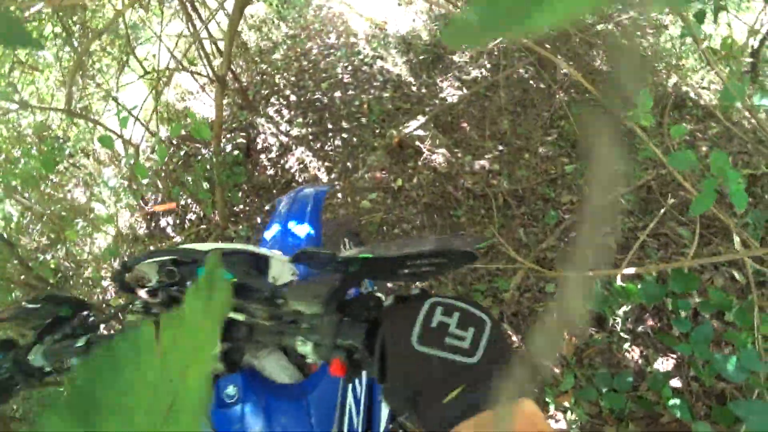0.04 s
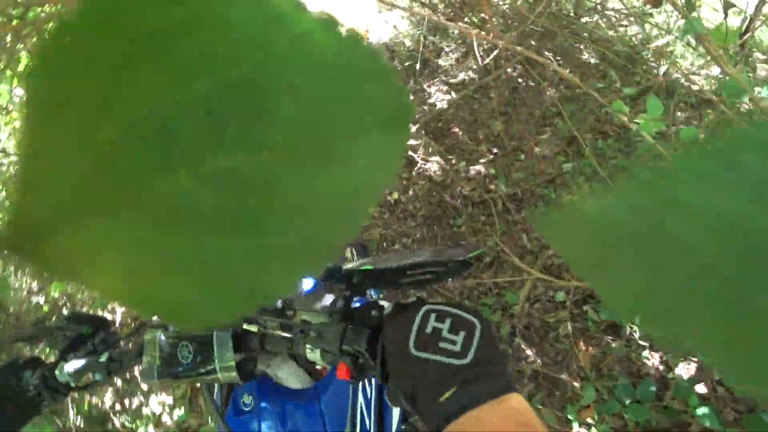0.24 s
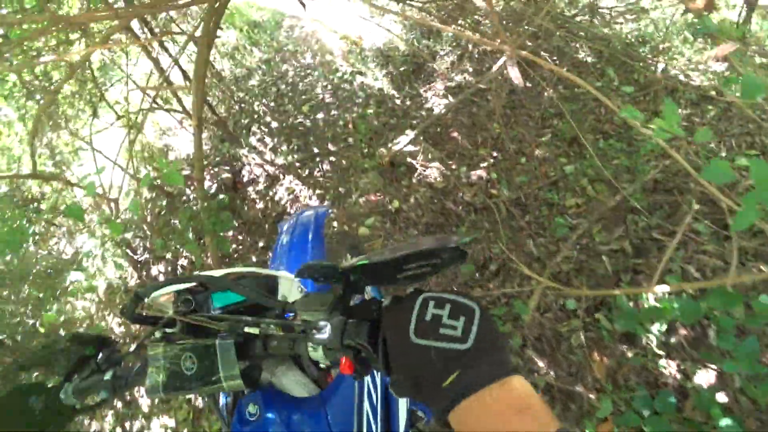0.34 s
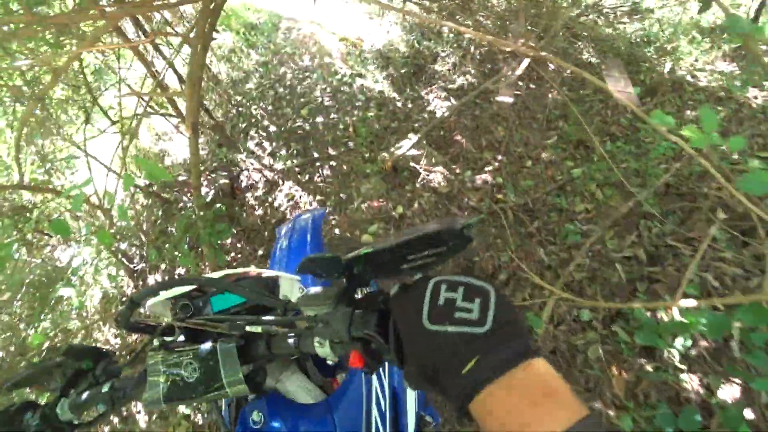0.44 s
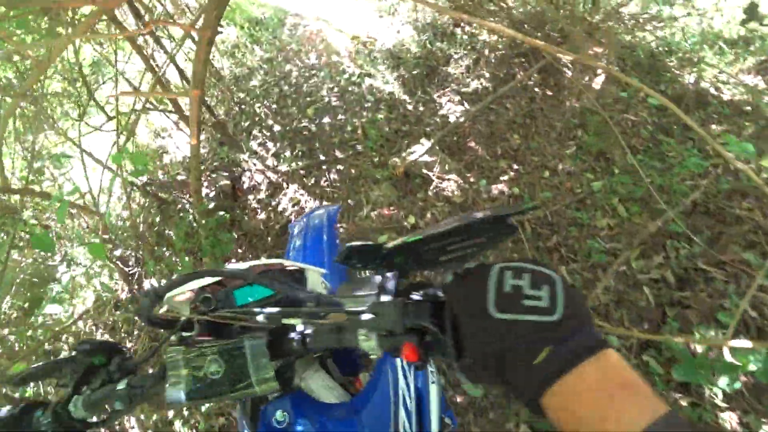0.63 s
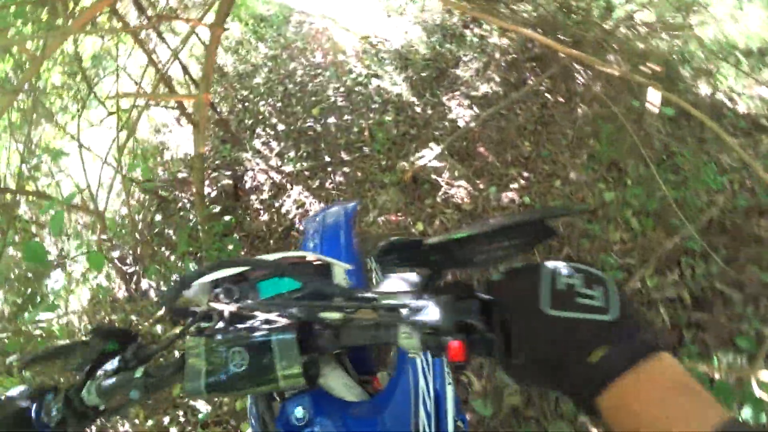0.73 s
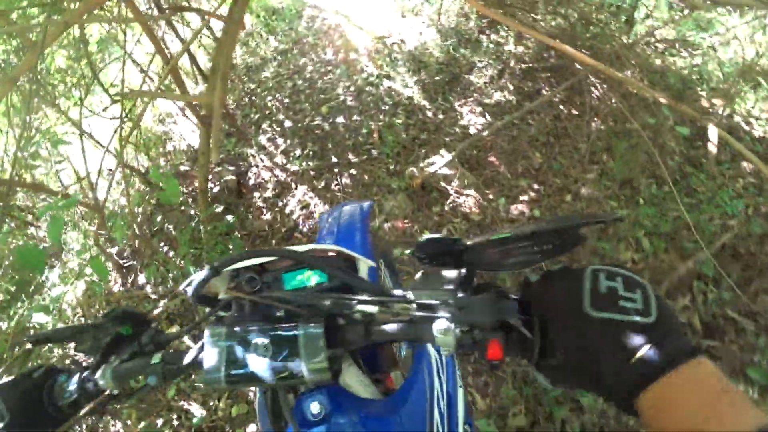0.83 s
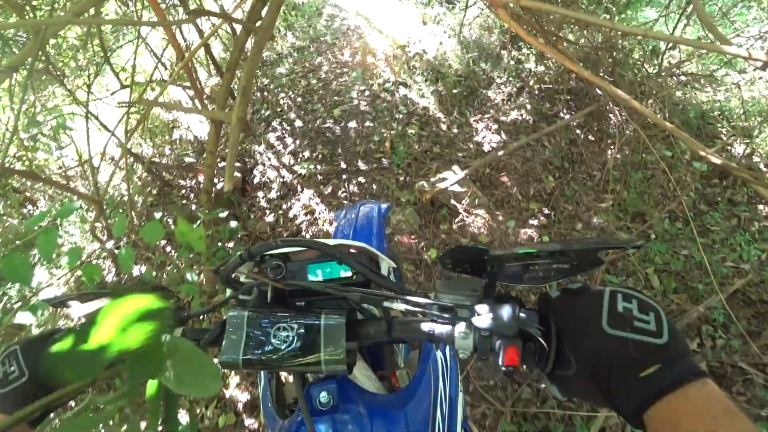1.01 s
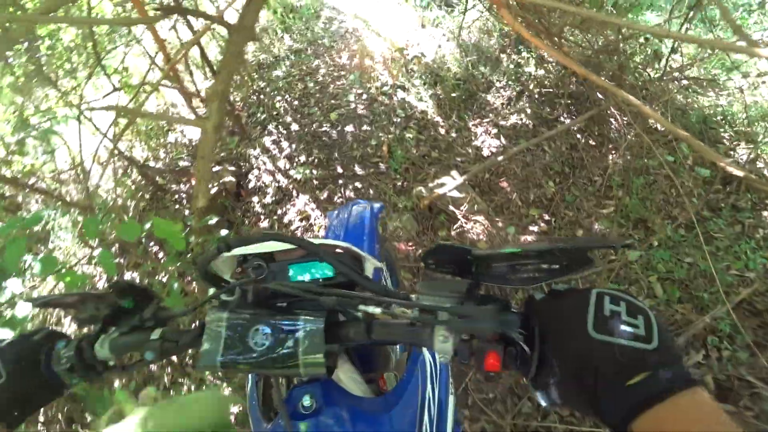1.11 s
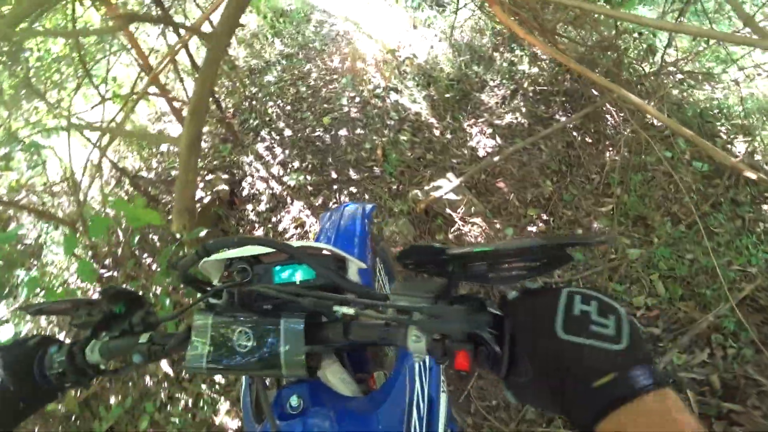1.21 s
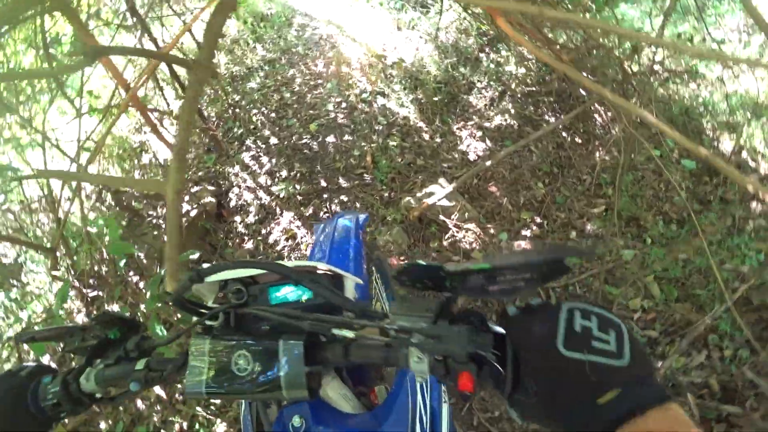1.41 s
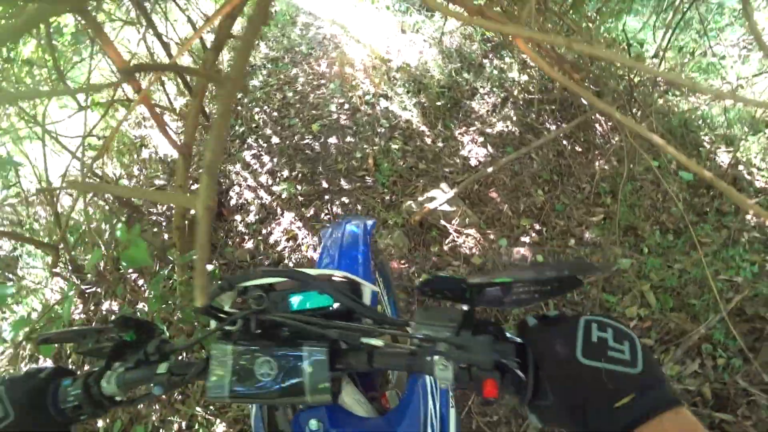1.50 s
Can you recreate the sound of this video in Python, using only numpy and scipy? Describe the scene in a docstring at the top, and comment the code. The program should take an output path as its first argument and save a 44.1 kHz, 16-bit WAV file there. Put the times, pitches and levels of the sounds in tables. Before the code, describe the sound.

Harsh rustling knocks of foliage against a helmet camera, with a single-cylinder engine puttering low underneath

```python
"""A single-cylinder motorbike idles in a thicket, heard through a helmet camera with two microphone ports.
Pipe resonances fed by the firings and coloured noise sound throughout, while twigs add snaps of noise.
Leaves and twigs drag over the camera: stick-slip clicks and knocks ring the modes of its housing, densest
from 0.24 to 0.42 s; after a quieter stretch a twiggier bout follows near 1 s and dies away after 1.2 s.
The housing is loud, and its main modes arrive almost opposite in the two ports."""
import sys
import numpy as np
from scipy import signal
from scipy.fft import rfft, irfft
from scipy.io import wavfile
from scipy.ndimage import uniform_filter1d

SR = 44100
rng = np.random.default_rng(int(sys.argv[2]) if len(sys.argv) > 2 else 0)


def put_to_file(sound):
    """Save the sound as 16-bit audio at rate SR, in the file named by the first command-line argument."""
    columns = np.atleast_2d(sound).T  # one column per channel
    safe = np.clip(columns, -1, 1)
    whole_steps = np.round(safe * 32767)
    wavfile.write(sys.argv[1], SR, whole_steps.astype(np.int16))


def voltage_ratio(decibels):
    """Convert decibels (scalar or array-like) to amplitude ratios, 20 dB per decade."""
    exponent = np.asarray(decibels, float) / 20
    return 10 ** exponent


N = 68355  # length in samples


def evened(x):
    """Normalisation: divides a signal by its root mean square."""
    return x / np.sqrt(np.mean(abs(x) ** 2) + 1e-20)


def mode(x, hz, width):
    """Damped resonance: a click of size 1 rings with height 1, as a complex wave; width in Hz sets the decay."""
    pole = np.exp((2j * np.pi * hz - np.pi * width) / SR)
    return -1j * signal.lfilter([1], [1, -pole], x)


def turn_at(hz):
    """Interaural-like phase: the angle between the ports varies with frequency."""
    # Each row: frequency in Hz, phase by which the left port leads in radians.
    port_turn = [(30, 0.24), (300, 1.6), (690, 2.72), (2300, 2.64), (4600, 2.61), (8100, .6), (16000, 0.1)]
    f, turn = np.transpose(port_turn)
    return np.interp(np.log(hz + 1), np.log(f), turn)


def ports(left, right, turn, pan_db):
    """Phase and level difference: the left port leads by turn (radians) and exceeds the right by pan_db."""
    left_port = left * np.exp(.5j * turn) * voltage_ratio(pan_db / 2)
    right_port = right * np.exp(-.5j * turn) * voltage_ratio(-pan_db / 2)
    return np.array([left_port, right_port])


def firings():
    """Cycle phase: the running count of firings, one per engine cycle, whole at each firing."""
    # Each row: time in seconds, firings so far.
    fired = [(-.030, -1), (.079, 1), (.722, 13), (.927, 17), (1.576, 30)]
    s, count = np.transpose(fired)
    return np.interp(np.arange(N) / SR, s, count)


def effort_db():
    """Engine load: a slow contour of effort in dB that raises and lowers the engine's sounds."""
    # Each row: time in seconds, engine effort in dB.
    load = [(0, -2), (.3, 0.1), (.55, -4.5), (.75, -4), (.95, 1.4), (1.2, 2.5), (1.3, 4.5), (1.419, -1.5),
            (1.55, -4.5)]
    return np.interp(np.arange(N) / SR, *np.transpose(load))


def rattle():
    """Amplitude-modulated noise: engine clatter and air, partly coherent between ports, breathe with the cycle."""
    # Each row: frequency in Hz, relative spectral level in dB.
    rattle_spectrum = [(30, -9), (120, -32), (180, -11), (270, -10), (380, -9.5), (700, -16.5), (1100, -10),
                       (1700, -18), (2800, -22), (3700, -30), (4800, -21.5), (6500, -32.5), (8500, -45.5),
                       (12000, -41), (16000, -53)]
    likeness = 0.58  # share of the left port's noise amplitude found in the right
    level_db, effort_share = -45, 0.44
    gate_db, gate_lag = 1.5, 0.29  # swing each way in dB, loudest point as a fraction of the cycle
    hz = np.fft.rfftfreq(N, 1 / SR)
    a, b = rfft(rng.standard_normal((2, N)))
    right = likeness * a + np.sqrt(1 - likeness ** 2) * b
    f, db = np.transpose(rattle_spectrum)
    colour = voltage_ratio(np.interp(np.log(hz + 1), np.log(f), db))
    noise = irfft(ports(a, right, turn_at(hz), -2.4) * colour, N)
    breath_db = gate_db * np.cos(2 * np.pi * (firings() - gate_lag))
    return voltage_ratio(level_db + effort_share * effort_db() + breath_db) * evened(noise)


def exhaust():
    """Pulse-excited pipe resonance: each firing sends a soft blow down the pipe."""
    # Each row: frequency in Hz, width of each of two cascaded resonators in Hz, relative level in dB.
    pipe_modes = [(139, 160, -33.5), (286.2, 67.6, -2.5), (476, 50, -11.5)]
    thump_db, spread_db, blow_s = -44.5, 3.5, 0.002
    blows = np.zeros(N)
    # A weaker blow follows half a cycle later, on the idle turn of the crank.
    between_db = -11.5 + 0.83 * effort_db()
    for lag, db in [(0, np.zeros(N)), (.5, between_db)]:
        at = np.flatnonzero(np.diff(np.floor(firings() - lag)) > 0)
        blows[at] = voltage_ratio(db[at] + spread_db * rng.standard_normal(len(at)))
    blows = np.convolve(blows, np.hanning(round(blow_s * SR) + 3))[:N]
    pipe = np.zeros(N, complex)
    for hz, width, db in pipe_modes:
        pipe += voltage_ratio(db) * mode(mode(blows, hz, width).real, hz, width) * width ** 2
    thumps = ports(pipe, pipe, 0.98, -1.5).real
    return voltage_ratio(thump_db + effort_db()) * evened(thumps)


def ticks():
    """Band-limited noise bursts: small bright snaps of dry twigs, alike in both ports."""
    # Each row: start in seconds, relative level in dB, centre frequency in Hz.
    snaps = [(.591, -35, 11100), (.961, -31.5, 9000), (1.035, -39, 12000), (1.115, -40, 10000),
             (1.527, -43, 6500)]
    decay_s, relative_width = 0.0042, 0.87  # resonator width as a fraction of its frequency
    out, t = np.zeros(N), np.arange(1000) / SR
    for s, db, hz in snaps:
        width = hz * relative_width
        burst = rng.standard_normal(1000) * np.exp(-t / decay_s)
        snap = mode(mode(burst, hz, width).real, hz, width).real
        out[round(s * SR):][:1000] += voltage_ratio(db) * snap
    return out


def housing():
    """Stick-slip and impact excitation: random slips, and knocks of a blow and a short skid, ring the modes."""
    # Each row: frequency in Hz, nominal width in Hz (doubled in each of two cascaded resonators),
    # relative level under leaves in dB, the same under a twig in dB, left over right in dB,
    # phase by which the left port leads in radians.
    housing_modes = [(97, 13.3, -22, -27, -8, 0.85), (180, 23.3, -11.5, -25, -8.5, 1.68),
                     (249.5, 4.87, -11.5, -29, -8, 1.58), (312, 46, -1.5, -15, -6, 1.39),
                     (457, 94, -3.5, -43, -8, 1.89), (669, 65, -3, 2, -5.5, 2.46),
                     (732.4, 37.6, -8.5, 4, -2.5, 2.02), (856, 82, -1.5, 3, -4.5, 2.03),
                     (1118, 95, -4, 1, -2.4, 2.33), (1555, 252, -2.5, -4.5, -1.26, 2.47),
                     (2187, 145, -8, -15.5, 0.5, 2.44), (2638, 386, -8, -22.5, -1, 2.48),
                     (3610, 780, -19, -28, -3, 2.7), (5010, 570, -16.5, -26.5, -5, 1.92),
                     (6173, 203, -26.5, -23, 0, 0.93), (7150, 750, -33.5, -51.5, -0.5, 0.31),
                     (10000, 2700, -43.5, -56, -1, 0.44), (11600, 1400, -53.5, -67, -2, 0.61)]
    # Each row: time in seconds, relative drag pressure in dB, sharpness in dB per octave,
    # what drags from 0 for leaves to 1 for a twig.
    drag = [(0, -63, -10.5, 0.01), (.11, -69, -1, 0.01), (0.123, -34.5, -2.5, 0.016),
            (.155, -46, -9.5, 0.0051), (.19, -47, 0.5, 0.01), (.205, -38, -5, 0.021),
            (.241, -38.5, -2.5, 0.01), (0.244, -14, 0, 0.0062), (0.271, -13, -3.5, 0.0078),
            (.288, -17, -2, 0.0079), (0.313, -22.5, 6, 0.01), (0.326, -23, -3, 0.0092),
            (0.352, -35.5, 1, 0.01), (0.374, -31.5, 7, 0.49), (.397, -32, 8, 0.5), (0.404, -35.5, -4, 0.24),
            (0.42, -27.5, 4, 0.092), (.435, -55, 8, 0.3), (.47, -51, 3, 0.078), (.52, -64, 5, 0.088),
            (0.596, -44.5, -8.5, 0.17), (.62, -37, -3.5, 0.11), (.68, -36, -2.5, 0.076),
            (.74, -40.5, -1, 0.44), (.8, -45.5, 0.5, 0.57), (.89, -43.5, -1, 0.62), (0.949, -44, -8, 0.44),
            (0.963, -22.5, -1, 0.21), (1.0, -42, 5.5, 0.68), (1.012, -23.5, -1.5, 1), (1.045, -23, 4, 0.93),
            (1.071, -36.5, 3.5, 0.55), (1.077, -28, 4, 0.58), (1.1, -21, -0.5, 0.52),
            (1.108, -39.5, 6.5, 0.53), (1.132, -22.5, -1.5, .9), (1.148, -20.5, 4, 0.92),
            (1.17, -28.5, 2, 1), (1.195, -31, 2, 0.45), (1.21, -37, 4, 0.83), (1.26, -41.5, 3, .2),
            (1.3, -45, -6.5, 0.065), (1.36, -37.5, -6, 0.074), (1.42, -44, -1, 0.13), (1.46, -51, 4, 0.26),
            (1.55, -62, 7.5, 0.09)]
    # Each row: start in seconds, blow level in dB before the mode weights, sharpness in dB per octave,
    # skid decay time in seconds, favoured frequency in Hz.
    knocks = [(0.117, -18.5, -2.5, 0.011, 910), (0.199, -21.5, 2, 0.0076, 1370),
              (0.202, -25.5, 4.5, 0.012, 1110), (0.244, -18, 4, 0.0071, 794), (0.26, -14, 4, 0.005, 850),
              (0.279, -11, 1, 0.012, 1480), (0.287, -16, -6, 0.0028, 1470), (0.292, -9.5, -2, 0.0044, 675),
              (0.297, -16, 6, 0.0055, 837), (0.305, -13.5, 7, 0.0068, 820), (0.308, -9.5, -5.5, 0.012, 626),
              (0.331, -5.5, 3, 0.012, 640), (0.341, -8, 3.5, 0.0053, 664), (0.353, -6, 1, 0.0014, 736),
              (0.356, -14, 0, 0.004, 767), (0.363, -6, -5, 0.0056, 685), (0.374, -7, -11, 0.0035, 830),
              (0.38, -8, -7, 0.012, 824), (0.386, -9, 1, 0.012, 840), (0.403, -6.5, 0.5, 0.0078, 840),
              (0.415, -4, -4, 0.0022, 635), (0.462, -35, -11.5, 0.0032, 840),
              (0.715, -30.5, 4, 0.0076, 657), (0.748, -34, 0, 0.008, 853), (0.809, -35.5, 4, 0.0051, 767),
              (0.842, -30.5, -2, 0.0021, 872), (0.866, -38.5, -13, 0.004, 716),
              (0.909, -25, 2, 0.0068, 711), (0.963, -17, 3, 0.0022, 666), (0.966, -17, -5, 0.0017, 716),
              (0.979, -25.5, 4, 0.012, 890), (1, -29, 4, 0.0026, 886), (1.012, -7.5, -7.5, 0.012, 704),
              (1.023, -13.5, 1, 0.004, 751), (1.035, -15.5, 7.5, 0.0058, 804),
              (1.04, -19.5, -13, 0.0061, 720), (1.058, -9, -0.5, 0.0027, 684),
              (1.081, -15, 3.5, 0.0045, 740), (1.09, -17.5, 6, 0.0034, 740), (1.12, -15, 3.5, 0.0032, 735),
              (1.138, -11.5, 3, 0.0056, 800), (1.15, -9.5, 3.5, 0.0027, 780),
              (1.171, -20.5, 6, 0.0076, 686), (1.182, -18, -6, 0.0075, 796), (1.279, -38, -7, 0.004, 567),
              (1.308, -28, 0.5, 0.0077, 1550), (1.348, -32, -0.5, 0.004, 1160),
              (1.392, -32.5, -6, 0.004, 920)]
    slips_per_s, slip_spread_db, rub_db = 700, 5.5, -10
    drag_db, apart = -0.5, 0.41  # pressure offset in dB, amplitude of the noise proper to each port
    skid_db, skid_rise_s = -11, 0.0002
    spot_db, spot_octaves = 8.5, 0.48  # a knock favours the modes near the spot it strikes
    deep_hz, treble_hz = 200, 3000
    hard_db, softness = -12, 0.85  # lighter knocks hardly reach the highest and lowest modes
    treble_blow_db, treble_rub_db = -2, -4

    t = np.arange(N) / SR
    s, *controls = np.transpose(drag)
    press_db, sharp, twig = (np.interp(t, s, c) for c in controls)
    slip_db = slip_spread_db * np.minimum(rng.exponential(1, N), 3)
    slips = (rng.random(N) < slips_per_s / SR) * voltage_ratio(slip_db) * rng.choice([-1, 1], N)
    drive = evened(slips) + voltage_ratio(rub_db) * rng.standard_normal(N)

    s, knock_db, knock_sharp, skid_s, spot_hz = np.transpose(knocks)
    at, u = np.round(s * SR).astype(int), np.arange(1500)
    rise = 1 - np.exp(-u / SR / skid_rise_s)
    skids = voltage_ratio(skid_db) * rise * np.exp(-u / SR / skid_s[:, None])

    out = np.zeros((2, N))
    for hz, width, leaf_db, twig_db, pan_db, turn in housing_modes:
        # Sharpness tilts the drive about 800 Hz, within limits, and spares the lowest mode.
        octaves = np.clip(np.log2(hz / 800), -1.5, 3) * (hz > 130)
        reach_db = spot_db * (np.exp(-(np.log2(hz / spot_hz) / spot_octaves) ** 2) - 1)
        if not deep_hz < hz < treble_hz:
            reach_db = reach_db + softness * np.minimum(knock_db - hard_db, 0)
        blow = voltage_ratio(knock_db + knock_sharp * octaves + reach_db)
        force = voltage_ratio(drag_db + press_db + sharp * octaves)
        np.add.at(force, at[:, None] + u, blow[:, None] * skids)
        high = hz > treble_hz
        treble_rub = high * voltage_ratio(treble_rub_db) * rng.standard_normal(N)
        friction = drive + treble_rub + apart * rng.standard_normal((2, N))
        x = friction * force * np.sqrt(width / SR)
        x[:, at] += voltage_ratio(high * treble_blow_db) * blow * rng.choice([-1, 1], len(at))
        x *= voltage_ratio(leaf_db + twig * (twig_db - leaf_db))
        x *= np.sqrt(width / 100) * 2 * np.pi * width / SR
        ring = mode(mode(x, hz, 2 * width).real, hz, 2 * width)
        out += ports(*ring, turn, pan_db).real * 6
    return out


def scene():
    """Superposition: the pressures of all sources add."""
    return rattle() + exhaust() + ticks() + housing()


def top_cut(x):
    """Nothing passes above the cut-off."""
    return signal.sosfilt(signal.butter(12, 16330, fs=SR, output="sos"), x)


def record(dry):
    """Dynamic compression: gain ducks at loud scrapes and recovers slowly; bass cut and hard ceiling follow."""
    knee_db, squeeze = -21.5, 0.18  # squeeze: dB of gain cut per dB over the knee
    recover_db_per_s = 48  # fall of the held level
    power_db = 10 * np.log10(abs(uniform_filter1d((dry ** 2).mean(0), 400)) + 1e-12)
    fall = np.arange(N) * recover_db_per_s / SR
    held_db = np.maximum.accumulate(power_db + fall) - fall
    over_db = np.maximum(held_db - knee_db, 0)
    x = dry * voltage_ratio(-squeeze * uniform_filter1d(over_db, 200))
    x = signal.sosfilt(signal.butter(2, 120, "high", fs=SR, output="sos"), x)
    return top_cut(np.clip(x, -1, 1))


dry = scene()
out = record(dry)
put_to_file(out)
```